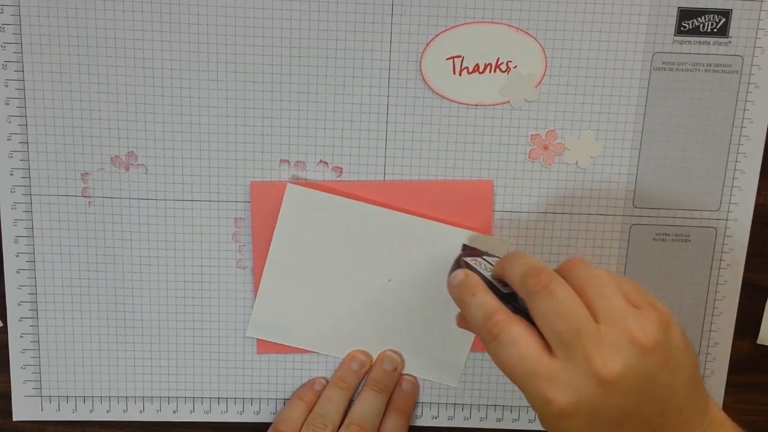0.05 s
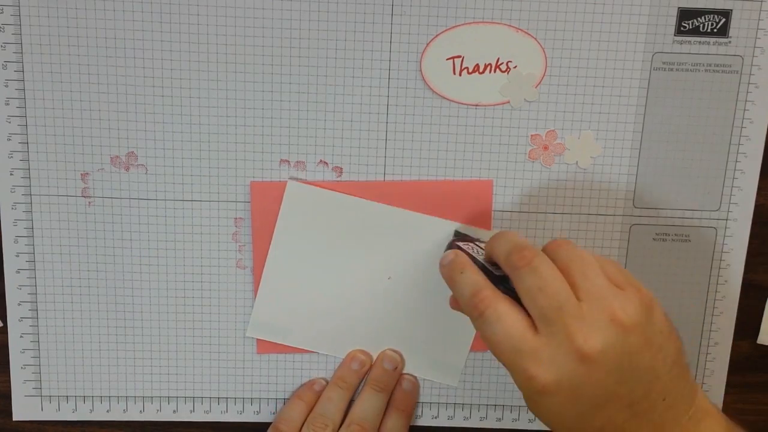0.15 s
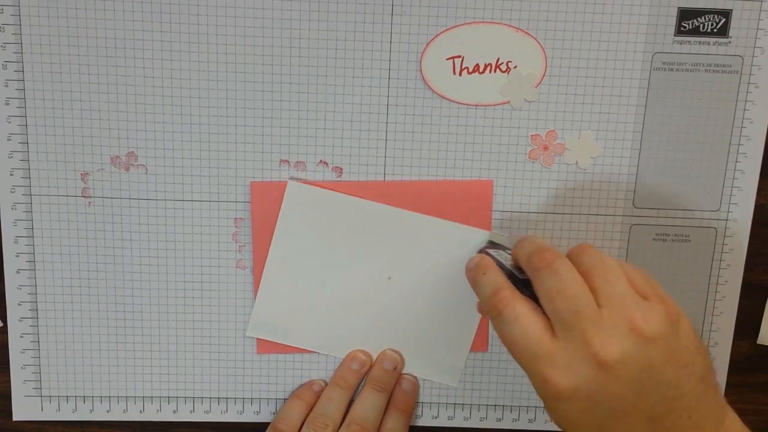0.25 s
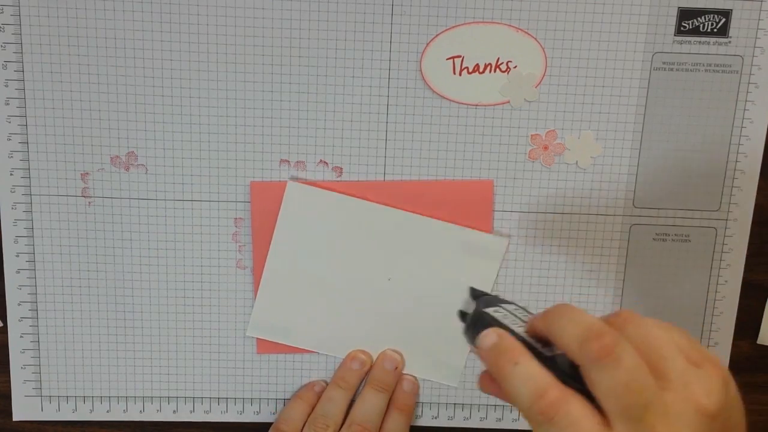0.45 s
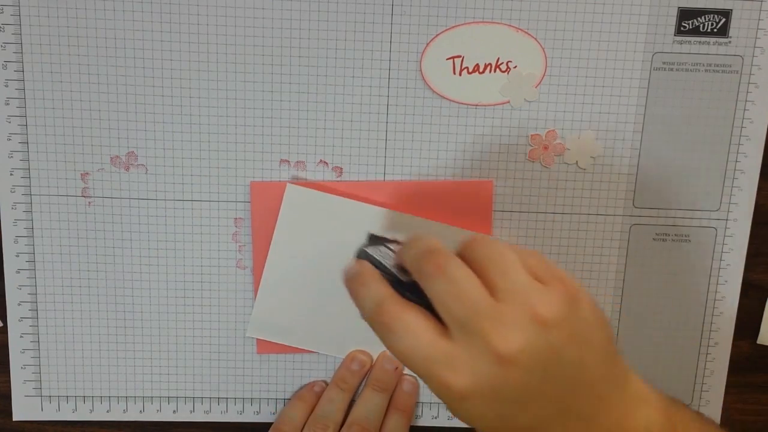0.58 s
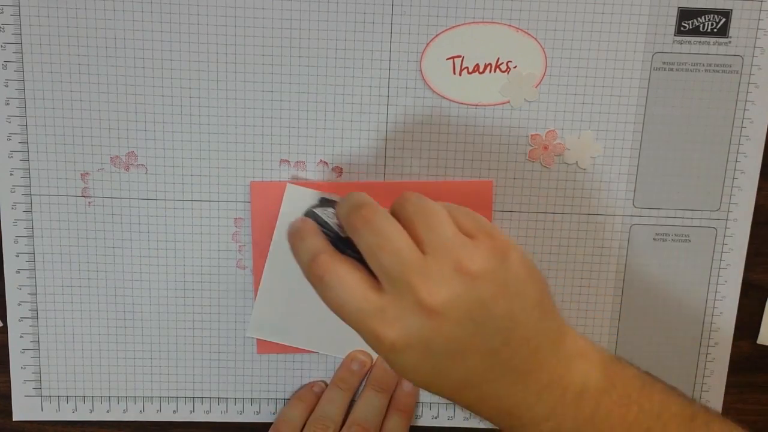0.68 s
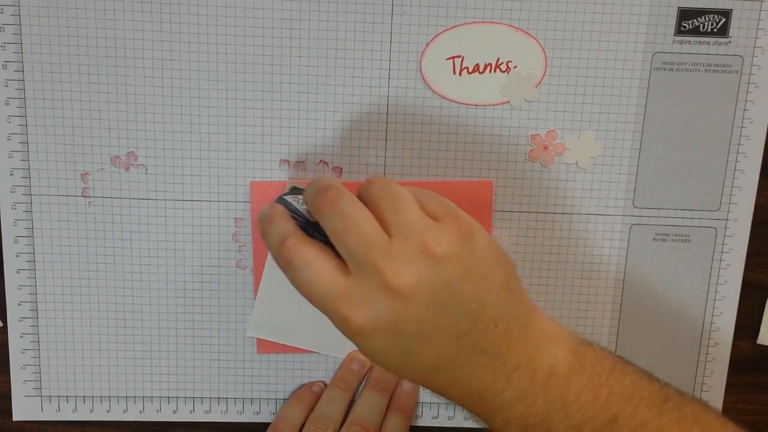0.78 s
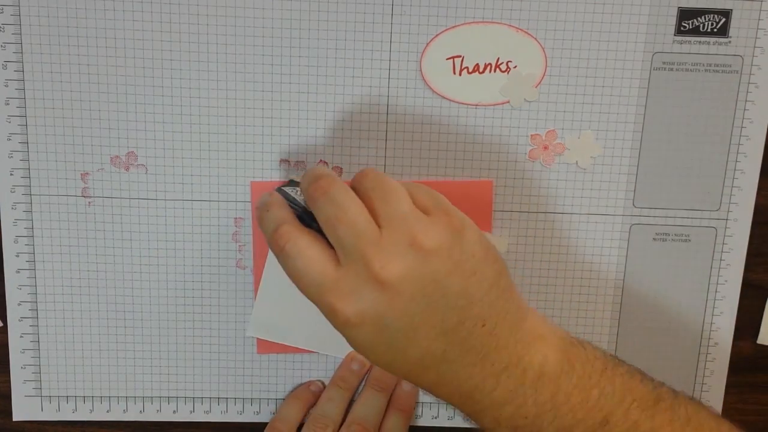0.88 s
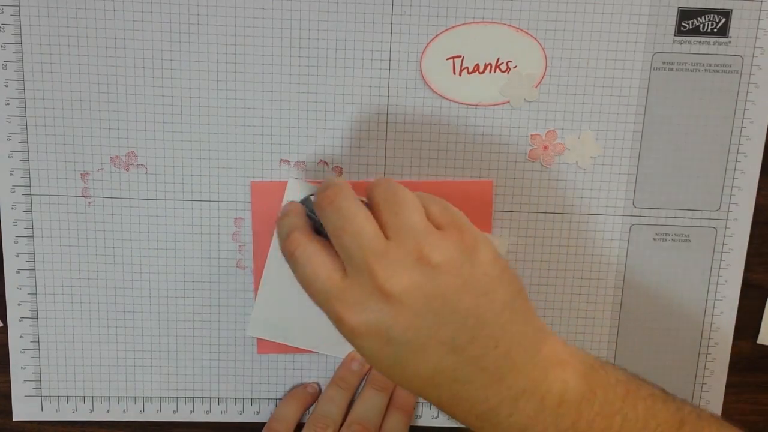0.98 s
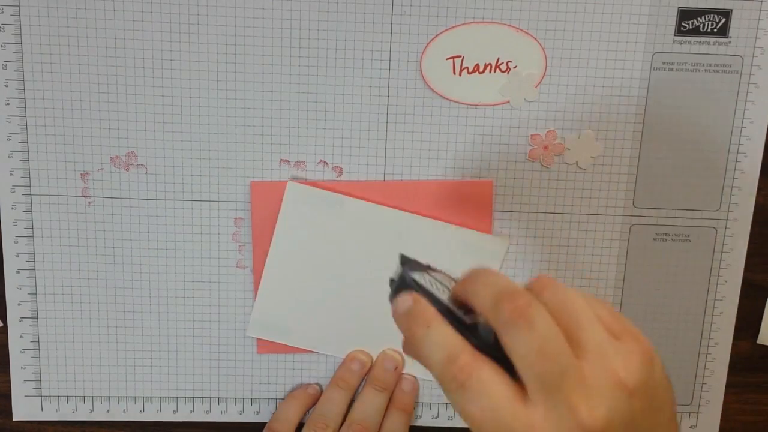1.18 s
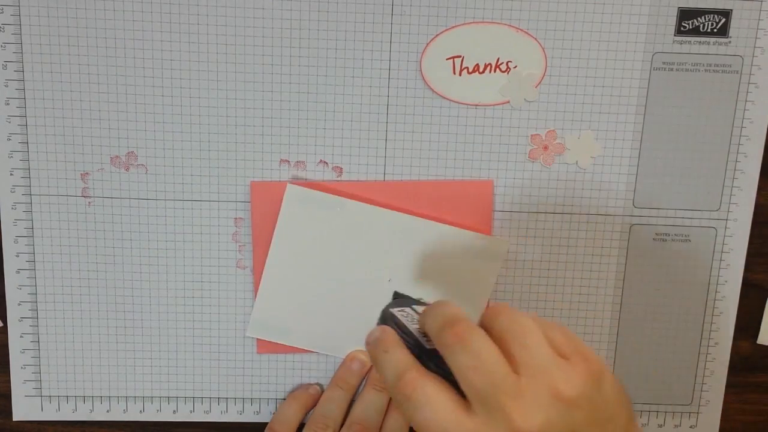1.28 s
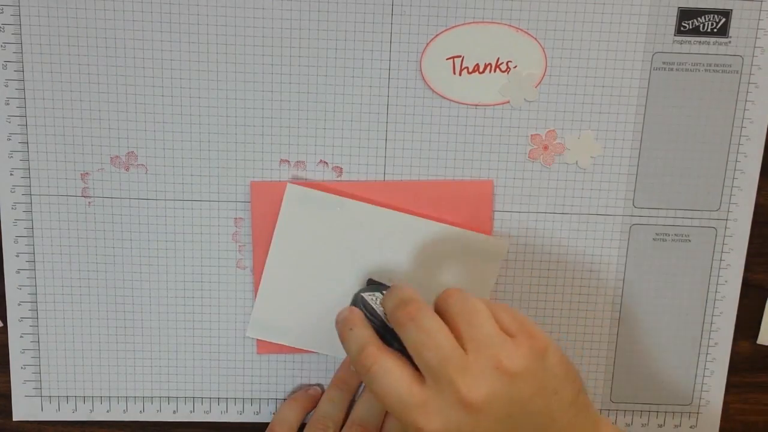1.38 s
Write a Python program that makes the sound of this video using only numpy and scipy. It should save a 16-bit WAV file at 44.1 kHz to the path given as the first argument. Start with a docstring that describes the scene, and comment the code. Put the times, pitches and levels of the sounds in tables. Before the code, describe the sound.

Close up in a small, live room, a tape runner clacks down on card and peels with a dense, slightly squeaky crackle over a low rumble. Its plastic case ticks faintly, then a second short stroke follows.

```python
"""A plastic tape runner, set down on cardstock and dragged along it twice, in a small live room.
Each stroke opens with a thump on the table and a clack of the case; then the adhesive peels in a dense
crackle, broken by sharp slips and brief squeaks, while the roller rumbles. Between strokes the case
ticks faintly in the hand. Heard close, on two unequal microphones with a little hiss and whine."""
import sys
import numpy as np
from scipy import signal
from scipy.fft import rfft, irfft
from scipy.io import wavfile
from scipy.ndimage import uniform_filter1d

SR = 44100
rng = np.random.default_rng(int(sys.argv[2]) if len(sys.argv) > 2 else 0)


def wrap_up_sound(samples):
    """Save the sound to the file named by the first command line argument, as 16-bit audio."""
    columns = np.atleast_2d(samples).T
    # keep every value between -1 and 1, then stretch to whole-number steps
    tamed = np.clip(columns, -1, 1)
    steps = np.round(tamed * 32767).astype(np.int16)
    wavfile.write(sys.argv[1], SR, steps)


N = 63945
T = np.arange(N) / SR
FREQS = np.fft.rfftfreq(2 * N, 1 / SR)
SNAP_RISE_S = 0.00082  # attack of slips and clacks


def amp(db):
    """Decibels to gain."""
    return 10 ** (np.asarray(db) / 20)


def unit_rms(x):
    """Scales to an rms of one."""
    return x / np.sqrt(np.mean(x ** 2) + 1e-20)


def curve(points, hz=FREQS):
    """Interpolates a table on a log-frequency axis."""
    f, value = np.transpose(points)
    return np.interp(np.log(hz + 1), np.log(f + 1), value)


def envelope(points):
    """Gain over time from a level curve, silent outside it."""
    return amp(np.interp(T, *np.transpose(points), left=-120, right=-120))


def add(mix, start_s, sound):
    """Mixes a sound in at a time."""
    part = mix[max(round(start_s * SR), 0):][:len(sound)]
    part += sound[:len(part)]


def colour(x, db):
    """Minimum-phase filter with the given gain curve."""
    cepstrum = np.fft.irfft(np.log(amp(db)))
    cepstrum[1:N] *= 2
    cepstrum[N + 1:] = 0
    return irfft(rfft(x, 2 * N) * np.exp(rfft(cepstrum)))[:N]


def shaped(x, db):
    """Colours a flat sound and keeps its power."""
    return colour(x, db - 10 * np.log10(np.mean(amp(db) ** 2)))


def tilted(x, db_per_octave):
    """Brightens or dulls a short sound around 4 kHz."""
    hz = np.clip(np.fft.rfftfreq(len(x), 1 / SR), 1200, 11000)
    return irfft(rfft(x) * amp(db_per_octave * np.log2(hz / 4000)), len(x))


def resonance(hz, width_hz, height_db):
    """One resonant peak, in dB over frequency."""
    return height_db / (1 + (2 * (FREQS - hz) / width_hz) ** 2)


def ring(modes, t, phases):
    """Decaying modes of a struck object."""
    return sum(amp(db) * np.exp(-np.log(1000) * t / t60) * np.sin(2 * np.pi * (hz * t + phase))
               for (hz, db, t60), phase in zip(modes, phases))


def room_tone():
    """Low, steady noise of the room, alike on both microphones."""
    spectrum = [(20, -32), (40, -6), (58, 7.5), (80, -7.5), (115, 0), (200, -6), (350, -8.5), (700, -17),
                (2000, -32)]  # room noise: frequency_hz, density_db
    return amp(-69.5) * shaped(rng.standard_normal(N), curve(spectrum))


def microphone_noise(whine_width_hz=19.4):
    """Each microphone's own hiss, and a thin electrical whine that sits to the right."""
    # hiss of each side: frequency_hz, density_db
    hiss_left = [(300, 4.5), (600, -4), (1500, -7), (4000, -5.5), (8000, -6.5), (12000, -12.5),
                 (15500, -11)]
    hiss_right = [(300, 0), (600, -5), (1500, -9), (4000, -7), (7000, -7.5), (9000, -1), (12000, -8),
                  (15500, -8.5)]
    whine_tones = [(6234, -71), (7790, -64), (9345, -65.5), (10895, -69), (12460, -68), (14020, -73.5)]  # partials of the whine: pitch_hz, level_db
    hiss = np.array([amp(db) * shaped(rng.standard_normal(N), curve(side))
                     for side, db in ((hiss_left, -65), (hiss_right, -62.5))])
    phase_step = np.sqrt(2 * np.pi * whine_width_hz / SR)
    drifts = phase_step * np.cumsum(rng.standard_normal((len(whine_tones), N)), axis=1)
    whine = sum(amp(db) * np.sqrt(2) * np.sin(2 * np.pi * hz * T + drift)
                for (hz, db), drift in zip(whine_tones, drifts))
    return hiss + whine * amp([[-43], [0]])


def room_tail():
    """Diffuse reflections at each microphone, each band dying at its own speed."""
    decay = [(100, 1), (400, 1), (1250, 0.35), (1650, 0.49), (2000, 0.34), (4000, 0.4), (7000, 0.36),
             (10000, 0.39), (15000, 0.36)]  # reverberation time: frequency_hz, t60_s
    hz, t, bands = signal.stft(rng.standard_normal((2, N)), SR, nperseg=256)
    fade = np.exp(-np.log(1000) * t / curve(decay, hz)[:, None])
    tail = signal.istft(bands * fade, SR, nperseg=256)[1][:, :N]
    return unit_rms(tail) / np.sqrt(N)


def in_room(x, room_db, early_db, early_fade_s=0.0015, room_rise_s=0.0031):
    """Direct sound, quick bounces off the table and hand, then the room."""
    early = unit_rms(rng.standard_normal((2, N)) * np.exp(-T / early_fade_s)) / np.sqrt(N)
    late = room_tail() * np.minimum(T / room_rise_s, 1) ** 2
    paths = amp(early_db) * early + amp(room_db) * late
    reflections = signal.fftconvolve(np.atleast_2d(x), paths, axes=1)[:, :N]
    return (x + reflections) / np.sqrt(1 + amp(early_db) ** 2)


def lingering_ring():
    """At the start, the room still rings faintly from an earlier stroke."""
    return amp(-59) * np.array([shaped(side / np.std(side[:1000]), peel_spectrum())
                                for side in room_tail()])


def case_ticks(rise_s=0.0015, fade_s=0.0036):
    """Loose parts tap inside the lifted runner, each through one broad resonance."""
    ticks = [(0.169, -57, 800, 350, 20), (0.532, -53, 1620, 343, 20), (0.61, -45, 2170, 1620, 13.5),
             (0.621, -53, 2120, 1600, 23), (0.655, -36.5, 1820, 420, 14.5), (1.3462, -41.5, 4100, 1700, 13)]  # taps: start_s, level_db, resonance_hz, width_hz, height_db
    spectrum = [(200, -24), (1000, -6), (1700, 10), (2600, -1), (7000, -1), (10000, -12), (16000, -34)]  # colour common to all taps: frequency_hz, density_db
    out, t = np.zeros(N), T[:2048]
    for start_s, db, hz, width_hz, height_db in ticks:
        tap = np.minimum(t / rise_s, 1) * np.exp(-t / fade_s) * rng.standard_normal(len(t))
        add(out, start_s, amp(db) * shaped(tap, curve(spectrum) + resonance(hz, width_hz, height_db)))
    return out


def table_top(thump_rise_s=0.0061, low_cut_hz=96):
    """The table thumps as the runner presses on it, and rumbles under the roller and hand."""
    rumble = [(0.17, -56.5), (0.20, -51), (0.33, -48), (0.385, -67), (0.42, -50.5), (0.51, -54),
              (0.58, -69.5), (0.89, -96), (0.92, -50.5), (0.98, -56), (1.05, -47), (1.12, -55), (1.22, -64),
              (1.33, -73)]  # course of the rumble: time_s, level_db
    spectrum = [(30, -3), (70, -10.5), (110, 7), (150, -5), (200, -4), (290, -3), (380, -20), (700, -10.5),
                (1500, -32.5)]  # colour of the rumble: frequency_hz, density_db
    thumps = [(0.194, -32.5), (0.204, -41), (0.247, -64), (0.269, -38.5), (0.351, -47), (0.414, -50),
              (0.910, -42), (0.926, -38), (0.983, -46.5), (1.068, -51)]  # presses of the runner: start_s, level_db
    modes = [(85.5, 3, 0.033), (117.3, 3.5, 0.092), (160.2, 0.5, 0.074), (243, -33, 0.15),
             (292, -11.5, 0.12)]  # modes of the table: pitch_hz, level_db, t60_s
    out, t = envelope(rumble) * shaped(rng.standard_normal(N), curve(spectrum)), T[:12000]
    thump = -np.minimum(t / thump_rise_s, 1) * ring(modes, t, np.zeros(len(modes)))
    for start_s, db in thumps:
        add(out, start_s, amp(db) * thump)
    return signal.sosfilt(signal.butter(2, low_cut_hz, "high", fs=SR, output="sos"), out)


def case_clacks(crack_fade_s=0.0026):
    """The case hits the card: a dry crack and the ring of the shell, which shifts with the grip."""
    clacks = [(0.1966, -40, -7.5, 1, 8.5), (0.2112, -28, 7.5, 0.87, -4.5), (0.2149, -23.5, -1.5, 0.99, 1.5),
              (0.9105, -45, -5.5, 0.72, -20), (0.923, -26.5, -2.5, 0.95, 0), (0.9886, -38.5, -2.5, 0.77, 6)]  # hits: start_s, level_db, tilt_db_per_octave, pitch_ratio, crack_db
    modes = [(980, -8, .012), (1290, -9, .04), (1580, -5, .018), (1750, 2, .03), (1870, -3, .02),
             (2330, -15, .02), (2820, -9, .02), (4050, -1, .022), (4900, -3, .02), (6800, -5, .018)]  # modes of the plastic shell: pitch_hz, level_db, t60_s
    spectrum = [(200, -10), (550, -45.5), (900, 7), (1600, -0.5), (2400, -9), (4500, 1.5), (7200, 15),
                (9000, -2.5), (12000, -9), (16000, -63)]  # colour of the crack: frequency_hz, density_db
    out, t = np.zeros(N), T[:4096]
    attack = np.minimum(t / SNAP_RISE_S, 1)
    for start_s, db, tilt, pitch_ratio, crack_db in clacks:
        noise = shaped(rng.standard_normal(len(t)), curve(spectrum))[:len(t)]
        crack = amp(crack_db) * np.exp(-t / crack_fade_s) * noise
        shell = 0.5 * ring(modes, t * pitch_ratio, rng.random(len(modes)))
        add(out, start_s, amp(db) * tilted(attack * (crack + shell), tilt))
    return out


def tape_squeaks(jitter=0.09):
    """Short unsteady glides where the tape sticks and slips quickly on the card."""
    squeaks = [(0.290, 0.021, 1063, 890, -45), (0.319, 0.042, 2697, 2740, -33.5),
               (0.329, 0.027, 1670, 1500, -49), (0.355, 0.017, 816, 977, -45.5),
               (1.004, 0.03, 722, 720, -47.5), (1.039, 0.0069, 2530, 2290, -32),
               (1.074, 0.022, 1132, 675, -45.5)]  # glides: start_s, length_s, start_hz, end_hz, level_db
    out = np.zeros(N)
    for start_s, length_s, start_hz, end_hz, db in squeaks:
        progress = T[:int(length_s * SR)] / length_s
        waver = unit_rms(uniform_filter1d(rng.standard_normal(N), size=40))[:len(progress)]
        hz = start_hz * (end_hz / start_hz) ** progress * (1 + jitter * waver)
        tone = np.sqrt(2) * np.sin(2 * np.pi * np.cumsum(hz) / SR)
        add(out, start_s, amp(db) * np.sin(np.pi * progress) * tone)
    return out


def strand_snaps(snaps_per_s=7000, spread_db=3.5):
    """Tiny snaps of adhesive strands, of uneven strength."""
    strength = amp(spread_db * np.minimum(rng.exponential(1, N), 4))
    polarity = rng.choice([-1., 1.], N)
    return unit_rms(strength * polarity * (rng.random(N) < snaps_per_s / SR))


def crackle(likeness=0.72):
    """Two trains of snaps, partly alike: the card radiates differently to each microphone."""
    shared = np.sqrt(likeness) * strand_snaps()
    return np.array([shared + np.sqrt(1 - likeness) * strand_snaps() for _ in range(2)])


def peel_spectrum():
    """Colour of the peeling tape, with the resonances of the runner."""
    spectrum = [(100, -66.5), (400, -20.5), (700, -21.5), (1100, -8.5), (1700, -4.5), (3300, -3.5),
                (5000, 3), (7300, -0.5), (9000, -6), (11500, -11.5), (14000, -15), (16000, -28)]  # the adhesive: frequency_hz, density_db
    body = [(1670, 300, 4), (2470, 1140, 7.5), (4350, 180, 2.5), (5230, 230, -1), (6810, 1070, 5)]  # resonances of the runner: centre_hz, width_hz, height_db
    return curve(spectrum) + sum(resonance(*peak) for peak in body)


def tape_peel(slip_fade_s=0.0023, treble_hz=8100):
    """Adhesive crackles under each stroke, with a burst of snaps wherever it sticks and lets go."""
    strokes = [
        [(0.186, -56.5), (0.205, -32), (0.225, -42), (0.25, -44), (0.27, -28), (0.29, -30.5), (0.335, -25.5),
         (0.362, -28.5), (0.371, -42), (0.40, -33), (0.422, -39.5), (0.445, -85)],
        [(0.905, -58), (0.92, -34.5), (0.94, -44.5), (0.998, -43), (1.006, -31), (1.035, -29.5), (1.055, -28),
         (1.08, -26), (1.10, -30.5), (1.118, -38), (1.15, -53)],
    ]  # how hard the tape peels, one curve a stroke: time_s, level_db
    slips = [(0.2533, -24.5, -4), (0.2678, -22, -2), (0.2739, -17.5, 2.5), (0.2919, -28.5, 6),
             (0.3024, -17, 2), (0.3134, -24, -1), (0.3234, -28, -3), (0.3394, -17, -0.5),
             (0.3539, -11.5, 2.5), (0.3614, -15.5, -4), (0.3955, -20.5, -4.5), (0.4134, -29, -8.5),
             (0.9495, -46, -16.5), (0.9666, -28.5, -4.5), (0.9856, -24, -3.5), (1.004, -22.5, 6),
             (1.0175, -19.5, 3), (1.030, -21, 7), (1.040, -31, -11.5), (1.051, -24.5, 7.5), (1.110, -19, 2)]  # sudden releases: start_s, level_db, tilt_db_per_octave
    effort, t = sum(envelope(stroke) for stroke in strokes), T[:1024]
    treble_gain = (effort / effort.max()) ** 0.29  # a harder peel is brighter
    highpass = signal.butter(2, treble_hz, "high", fs=SR, output="sos")
    burst = np.minimum(t / SNAP_RISE_S, 1) * np.exp(-t / slip_fade_s)
    sides = []
    for snaps, slip_snaps in zip(crackle(), crackle()):
        treble = signal.sosfiltfilt(highpass, snaps)
        peel = effort * (snaps + treble * (treble_gain - 1))
        for k, (start_s, db, tilt) in enumerate(slips):
            slip = burst * slip_snaps[k * len(t):][:len(t)]
            add(peel, start_s, amp(db) * tilted(slip, tilt))
        sides.append(shaped(peel, peel_spectrum()))
    return np.array(sides)


def scene():
    """The runner on its table, close to two unequal microphones, over the room tone."""
    imbalance = [(100, 0.9), (1000, -0.5), (1700, 1.5), (5000, 1), (7200, 5), (8500, -8), (10500, -7),
                 (15000, -3.5)]  # the microphone pair: frequency_hz, left_minus_right_db
    left, right = (in_room(tape_peel(), room_db=-0.5, early_db=-2)
                   + in_room(tape_squeaks(), room_db=-18.5, early_db=-5)
                   + in_room(case_clacks(), room_db=-7, early_db=-7)
                   + in_room(case_ticks(), room_db=-5, early_db=-7)
                   + in_room(table_top(), room_db=-21, early_db=-37)
                   + lingering_ring())
    half_db = curve(imbalance) / 2
    runner = np.array([colour(left, half_db), colour(right, -half_db)])
    return runner + microphone_noise() + room_tone()


def record(dry):
    """The recorder passes nothing above about 16 kHz."""
    lowpass = signal.firwin(511, cutoff=15650, window=("kaiser", 9), fs=SR)
    return signal.oaconvolve(dry, lowpass[None], "same")


dry = scene()
out = record(dry)
wrap_up_sound(out)
```